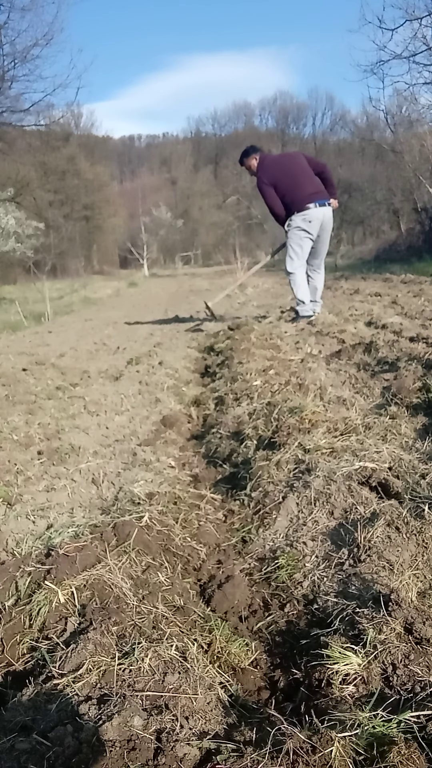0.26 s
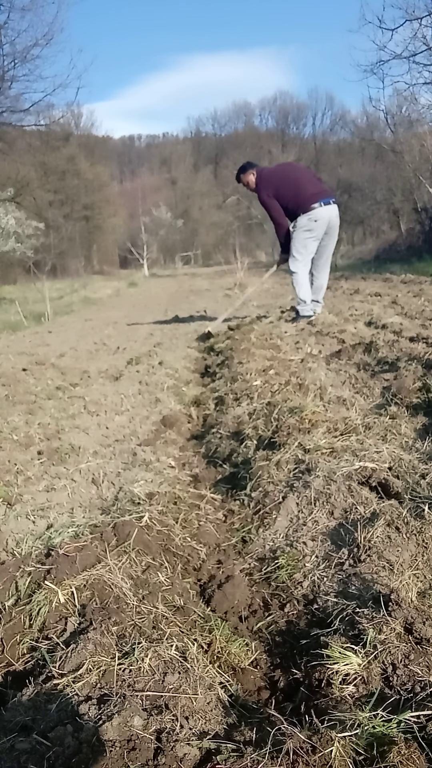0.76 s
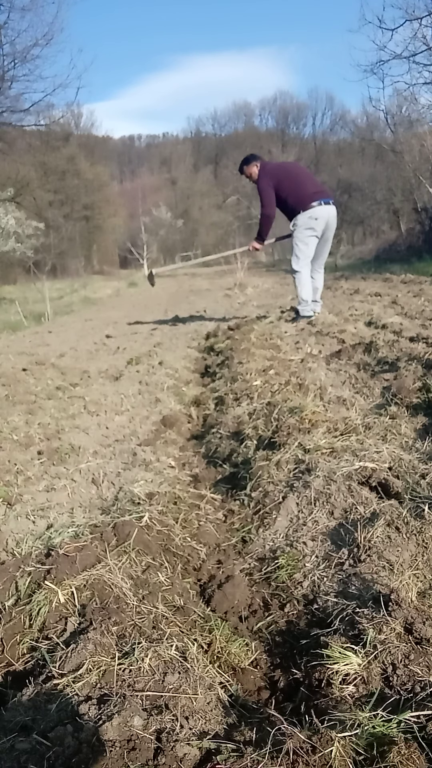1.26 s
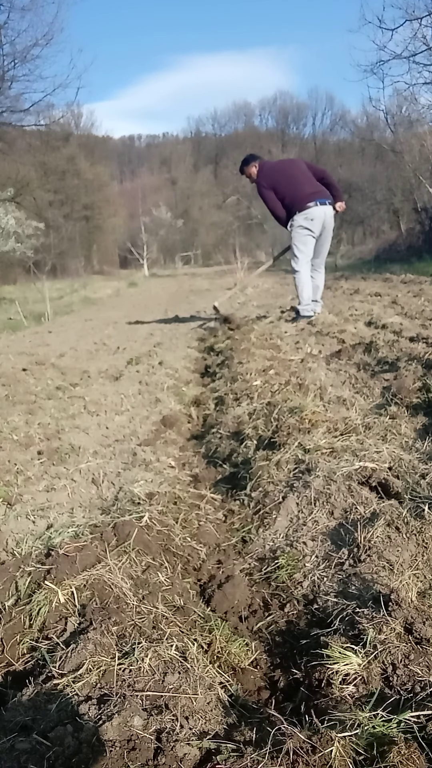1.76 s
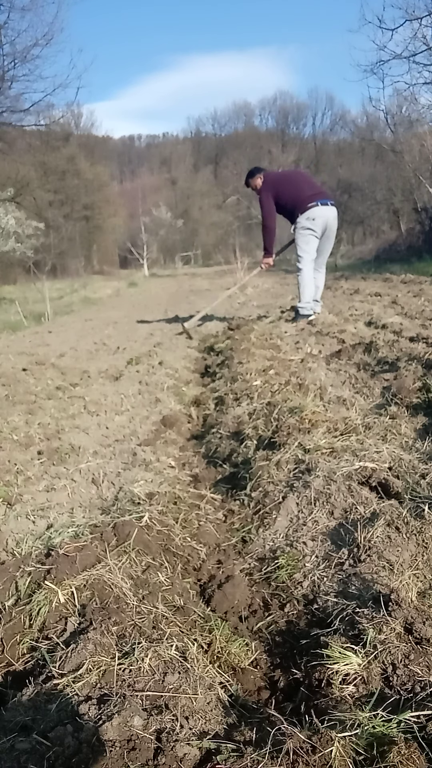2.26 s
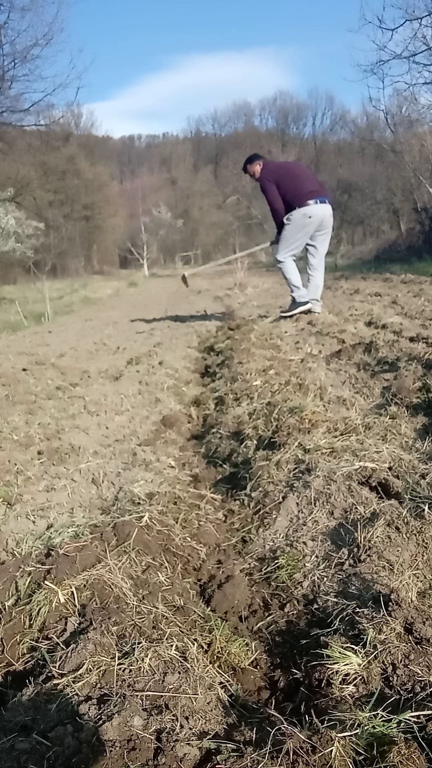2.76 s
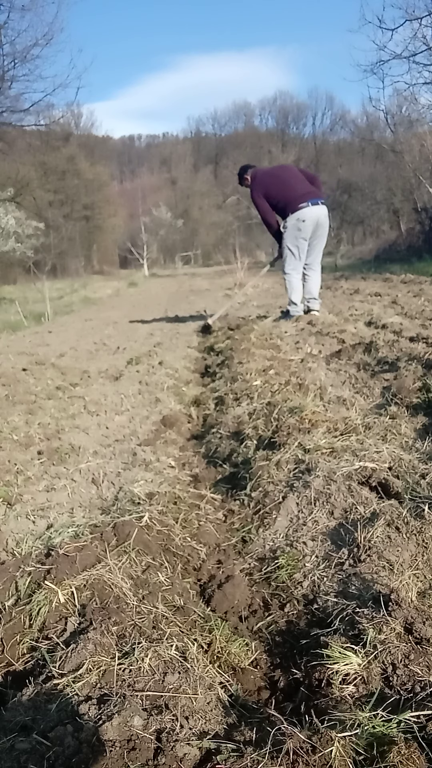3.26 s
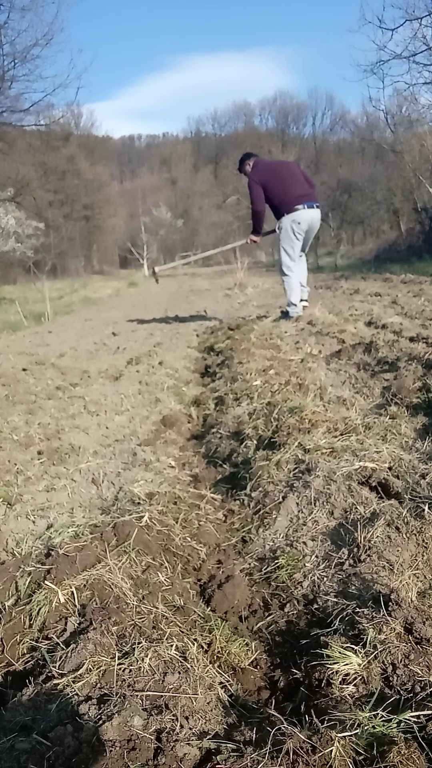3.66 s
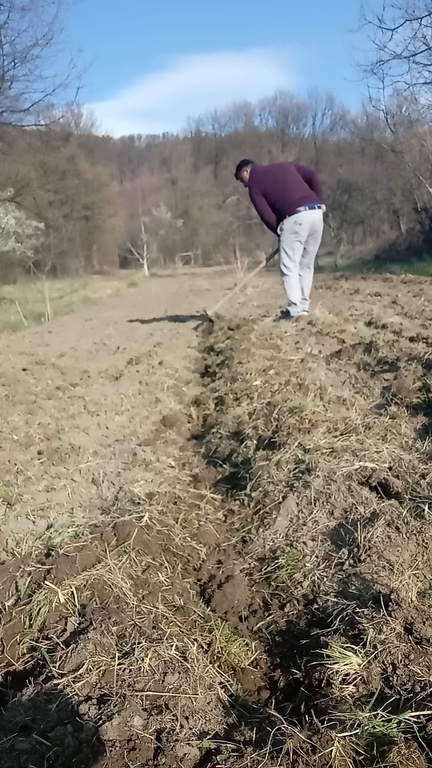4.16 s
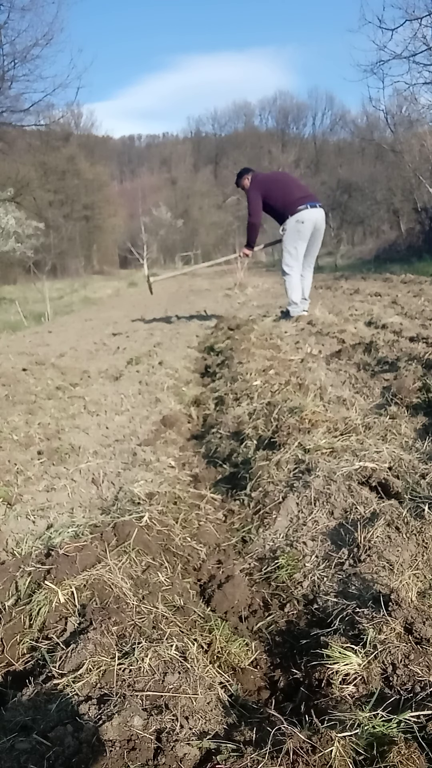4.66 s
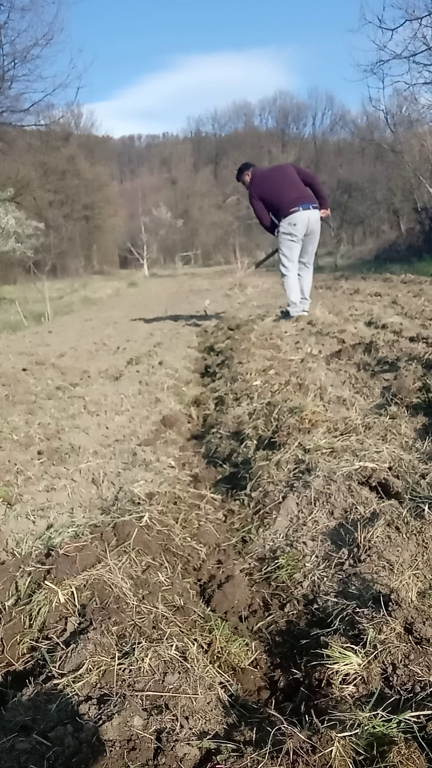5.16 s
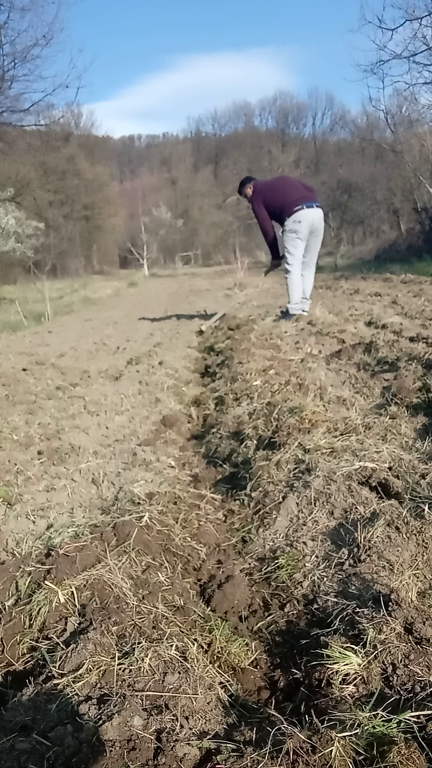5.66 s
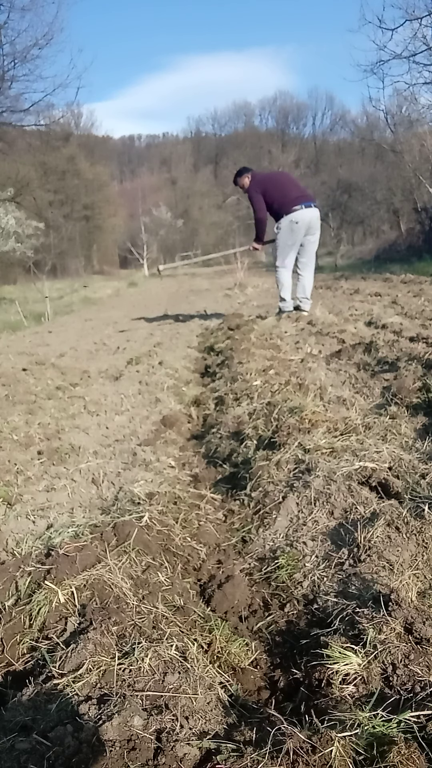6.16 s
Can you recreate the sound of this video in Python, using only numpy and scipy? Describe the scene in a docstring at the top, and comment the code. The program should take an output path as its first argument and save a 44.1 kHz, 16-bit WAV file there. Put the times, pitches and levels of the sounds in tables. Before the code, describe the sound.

Steady low phone buzzes come and go every two seconds outdoors, with small ticks, soft bumps and distant crisp hoe strokes in dry earth.

```python
"""A phone's vibration motor is already buzzing; it stops, then runs one second in every two beside the microphone.
Its off-centre weight spins up, shakes the case and coasts to rest while shaft and brushes rasp.
From the first pause on, a hoe chops dry soil across a quiet field, and ticks and soft bumps sound now and then.
Throughout, coloured noise makes the murmur of the air and the rumble of a breeze, and a gliding sine hums far off."""
import sys
import numpy as np
from scipy import signal
from scipy.fft import rfft, irfft, next_fast_len
from scipy.io import wavfile
from scipy.ndimage import uniform_filter1d

SR = 44100
rng = np.random.default_rng(int(sys.argv[2]) if len(sys.argv) > 2 else 0)


def digitize_waveform(pressure):
    """Quantize a signal to 16-bit integers and store it at the path in sys.argv[1].

    Rows of a 2-D input are taken as channels; values are limited to [-1, 1].
    """
    field = np.atleast_2d(pressure).T
    bounded = np.clip(field, -1, 1)
    quanta = np.round(bounded * 32767).astype(np.int16)
    wavfile.write(sys.argv[1], SR, quanta)


N = 283563
TIME = np.arange(N) / SR
AGE = np.arange(SR // 3) / SR  # seconds since a hit

# low hum, probably a far engine: time_s, pitch_hz, level_db
HUM_TRACK = [(0.0, 62, -63), (0.1, 60.6, -69.5), (2.66, 57.23, -71), (2.97, 63.3, -73), (3.66, 60.9, -64),
             (5.47, 66.14, -65), (5.9, 66.9, -72)]
# spectrum of the open air: frequency_hz, relative_density_db (per Hz)
AIR_SPECTRUM = [(120, -24.5), (200, -17), (380, -18), (560, -5), (750, -5.5), (1050, 1.5), (1500, -4.5),
                (1850, -11.5), (2200, -20), (2800, -28), (4500, -31.5), (6500, -34.5), (8500, -48),
                (16000, -46.5)]
# spectrum of the breeze's rumble: frequency_hz, relative_density_db (per Hz)
RUMBLE_SPECTRUM = [(20, -27.5), (35, -19.5), (50, -4), (62, -0.5), (78, -1.5), (110, -2), (170, -11),
                   (260, -24.5), (500, -53)]
# soft bumps on the phone: start_s, level_db, pitch_hz, t60_s
PHONE_BUMPS = [(.762, -40.5, 89, 0.048), (4.945, -43, 101.4, 0.11), (4.99, -46.5, 105, 0.089),
               (5.083, -28.5, 124, 0.031), (5.104, -39, 86, 0.11), (5.365, -48, 123, 0.065),
               (6.35, -46, 85, 0.19)]
# sharp ticks, mostly the motor catching or settling: start_s, level_db, centre_hz
SHARP_TICKS = [(0.8698, -59.5, 4400), (.9638, -79, 7160), (1.4337, -51, 5660), (1.44, -50, 5800),
               (2.56, -56.5, 5300), (3.3356, -71, 2800), (3.4345, -46.5, 4590), (3.453, -61, 5000),
               (5.4409, -54, 5260), (5.448, -48.5, 5000), (5.452, -52, 5500)]
# hoe blows: start_s, level_db, bite_length_s, treble_tilt_db_per_octave
HOE_BLOWS = [(0.7235, -49, 0.0046, 3), (0.729, -48, 0.0046, 2), (.742, -46, 0.015, -0.5),
             (1.527, -54.5, 0.01, -1), (2.316, -58, 0.0085, 5), (3.194, -56, 0.011, 6),
             (3.208, -55.5, 0.017, -3.5), (4.0209, -46.5, 0.0074, 1), (4.8183, -47.5, 0.0099, 0),
             (5.67, -54, 0.0063, -1)]
# spectrum of the blade biting the soil: frequency_hz, relative_density_db (per Hz)
BITE_SPECTRUM = [(300, -17), (1100, -11), (1750, 1), (2200, -0.5), (2850, 3), (3400, -10), (4500, -3),
                 (5200, -11), (7400, -6.5), (9000, -19.5), (13000, -28.5), (15500, -23)]
# spectrum of the crumbs it throws: frequency_hz, relative_density_db (per Hz)
CRUMB_SPECTRUM = [(500, -8.5), (1800, 5.5), (2600, 0.5), (3100, 8), (3700, -2), (4600, -2), (5500, -3.5),
                  (7400, -4), (9500, -19), (15000, -30)]
# ringing modes of the hoe blade: frequency_hz, relative_level_db
BLADE_MODES = [(3100, -4), (3850, -3.5), (4600, -1), (7450, -9)]
# motor runs: on_s, off_s, full_speed_hz (turns per second)
MOTOR_RUNS = [(-.566, .416, 187.4), (1.434, 2.419, 188.2), (3.434, 4.427, 188.1), (5.441, 6.43, 188.2)]
FULL_SPEED_HZ = MOTOR_RUNS[1][2]
# partials of the rasp of one turn, as heard through the case: multiple_of_speed, relative_level_db
RASP_PARTIALS = [(1, 0), (2, -41), (3, -35), (4, -41), (5, -23.5), (6, -37), (7, -33), (8, -21), (9, -29),
                 (10, -49), (11, -36), (12, -39), (13, -33), (14, -41), (15, -38), (16, -55), (17, -31),
                 (18, -43), (19, -39), (20, -33), (21, -40), (22, -37), (23, -38), (24, -33), (25, -41),
                 (26, -31), (27, -36), (28, -38), (29, -41), (30, -35), (31, -44), (32, -31.5), (33, -48),
                 (34, -47), (35, -39), (36, -47), (37, -48), (38, -49), (39, -53), (40, -56), (41, -43),
                 (42, -56), (43, -53), (44, -53), (45, -63), (46, -57), (47, -63), (48, -53), (49, -56),
                 (50, -65), (51, -61), (52, -59), (53, -57), (54, -69), (55, -58), (56, -56), (57, -58),
                 (58, -58), (59, -67), (60, -57), (61, -64), (62, -66), (63, -66), (64, -57), (65, -65),
                 (66, -59)]
# spectrum of the shaft sliding smoothly: frequency_hz, relative_density_db (per Hz)
SLIDE_SPECTRUM = [(200, -16.5), (400, -8.5), (650, 4), (1000, 6), (1600, 1.5), (1950, -6), (2900, -8),
                  (4300, 0), (6500, -12), (7600, -19.5), (9000, -26), (13500, -35), (15500, -21)]
# spectrum of the weight's low unsteadiness: frequency_hz, relative_density_db (per Hz)
JUDDER_SPECTRUM = [(40, -35.5), (110, 0), (190, -3.5), (270, -3.5), (400, -24), (900, -46), (3000, -80.5)]
# how the case passes on rubbing, with a sharp resonance the partials glide through: frequency_hz, relative_gain_db
CASE_RESPONSE = [(180, -24), (400, -20), (620, -9), (950, -1), (1200, -4), (1550, 2), (1900, -10),
                 (2050, -7), (2130, 3), (2210, 5), (2255, -8), (2800, -7), (4600, -1), (6800, -2),
                 (8500, -15), (13500, -28), (15500, -18)]


def undb(db):
    """Decibels express an amplitude ratio logarithmically; this returns the ratio."""
    return 10 ** (np.asarray(db) / 20)


def unit(x):
    """Normalization: dividing by the root mean square gives unit power."""
    return x / np.sqrt(np.mean(x ** 2) + 1e-20)


def colour(x, points, tilt_db=0):
    """Minimum-phase filtering: folding the cepstrum makes a causal filter of unit power gain through the points."""
    hz, db = np.transpose(points)
    size = 8192
    octave = np.log2(np.maximum(np.fft.rfftfreq(size, 1 / SR), 1))
    # the tilt pivots at 4 kHz and stops growing two octaves below
    tilt = tilt_db * np.maximum(octave - np.log2(4000), -2)
    gain = unit(undb(np.interp(octave, np.log2(hz), db) + tilt))
    cepstrum = irfft(np.log(gain))
    cepstrum[1:size // 2] *= 2
    cepstrum[size // 2 + 1:] = 0
    impulse = irfft(np.exp(rfft(cepstrum)))[:size // 2]
    return signal.oaconvolve(x, impulse)[:len(x)]


def noise(size=N):
    """White noise: independent Gaussian samples of rms 1 have a flat mean spectrum."""
    return rng.standard_normal(size)


def walk(rate, size=N):
    """Slow random modulation: joined chance points, rate a second, give a spread near 1."""
    points = rng.standard_normal(2048)
    return 1.2 * np.interp(TIME[:size] * rate, np.arange(len(points)), points)


def fade(t60):
    """Exponential damping: the level falls by 60 dB in t60 seconds after a hit."""
    return np.exp(-np.log(1000) * AGE / t60)


def add(out, start, sound):
    """Superposition: a sound is summed in from start seconds."""
    i = int(start * SR)
    out[i:i + len(sound)] += sound[:N - i]


def hum(waver_db=1.5, waver_rate=7):
    """Periodic tone: one sine of gliding pitch, probably a far engine's firing note, wavers in level."""
    times, hz, db = np.transpose(HUM_TRACK)
    cycle = np.cumsum(np.interp(TIME, times, hz)) / SR
    level_db = np.interp(TIME, times, db) + waver_db * walk(waver_rate)
    return np.sqrt(2) * np.sin(2 * np.pi * cycle) * undb(level_db)


def murmur(air_db=-68.5, swell_db=1.15, flicker_db=1.5, patchy_db=2.5):
    """Band-wise modulation: the bands of distant noise swell and flicker together, and each also drifts
    patchily on its own."""
    size = next_fast_len(N, True)
    level_db = air_db + swell_db * walk(6.5) + flicker_db * walk(25)
    air = rfft(colour(noise(), AIR_SPECTRUM) * undb(level_db), size)
    band = np.digitize(np.fft.rfftfreq(size, 1 / SR), [700, 1000, 1400, 2400])
    out = 0
    for k in np.unique(band):
        out = out + irfft(air * (band == k), size)[:N] * undb(patchy_db * walk(9))
    return out


def breeze(breeze_db=-69, gust_db=3.5, gusts_per_s=9):
    """Turbulent pressure: low-frequency noise at the microphone rises and falls with the gusts."""
    rumble = colour(noise(), RUMBLE_SPECTRUM + [(2000, -120)])
    return rumble * undb(breeze_db + gust_db * walk(gusts_per_s))


def field():
    """Superposition of independent noises: the murmur of the air lies over the breeze's rumble."""
    return murmur() + breeze()


def bumps(push_s=0.0033):
    """Damped oscillation: a soft push on the case sets off a low, quickly decaying sine."""
    out = np.zeros(N)
    for start, db, hz, t60 in PHONE_BUMPS:
        push = 1 - np.exp(-AGE / push_s)
        add(out, start, undb(db) * fade(t60) * push * np.sin(2 * np.pi * hz * AGE))
    return out


def ticks(t60=0.0055, tail_db=-22, tail_t60=0.14):
    """Impulsive contact: a tiny hard hit is a short burst of band-limited noise with a faint tail."""
    out = np.zeros(N)
    for start, db, hz in SHARP_TICKS:
        hit = noise(len(AGE)) * undb(db) * (fade(t60) + undb(tail_db) * fade(tail_t60))
        band = [(hz / 4, -25), (hz * 0.65, -4), (hz, 0), (hz * 1.43, -5), (hz * 2, -20)]
        add(out, start, colour(hit, band))
    return out


def hoe(crumb_db=-15, crumb_t60=0.23, grit_db=3, ring_db=-23, ring_t60=0.27):
    """Fracture and modal ringing: grains crack in a short swell, then crumbs spray and the blade rings faintly."""
    out, size = np.zeros(N), len(AGE)
    for start, db, length, tilt_db in HOE_BLOWS:
        progress = np.minimum(AGE / length, 1)
        grains = unit(noise(size) * undb(grit_db * walk(268, size)))
        bite = colour(grains * np.sin(np.pi * progress), BITE_SPECTRUM, tilt_db)
        push = progress * np.sqrt(length / 0.0036)  # a longer bite throws more
        spray = noise(size) * push * fade(crumb_t60)
        crumbs = colour(spray * undb(crumb_db + 4.4 * walk(200, size)), CRUMB_SPECTRUM)
        modes = sum(undb(mode_db) * walk(60, size) * np.sin(2 * np.pi * hz * AGE) for hz, mode_db in BLADE_MODES)
        ring = modes * push * fade(ring_t60) * undb(ring_db)
        add(out, start, undb(db) * (bite + crumbs + ring))
    return out


def spin(rise_s=.054, creep=.025, creep_s=.3, coast_s=.105, drag_hz=28, wobble=0.000862):
    """Rotational inertia: speed in turns a second rises fast, creeps to full, then friction stops it; also the drive."""
    speed, drive = np.zeros(N), np.zeros(N)
    for on, off, full_hz in MOTOR_RUNS:
        driven = np.clip(TIME, on, off) - on
        up = full_hz * (1 - (1 - creep) * np.exp(-driven / rise_s) - creep * np.exp(-driven / creep_s))
        coasting = np.exp(-np.maximum(TIME - off, 0) / coast_s)
        # steady drag brings the weight to a full stop
        speed += np.maximum((up + drag_hz) * coasting - drag_hz, 0)
        drive += (TIME > on) & (TIME < off)
    return speed * (1 + wobble * walk(25)), uniform_filter1d(drive, SR // 100)  # 10 ms edges


def rasp(turn, scatter=1.5, shift=.2, shift_rate=4, flutter=.1):
    """Periodic friction: rubs recur on every turn; contacts shift slowly and flutter, most in high partials."""
    multiple, db = np.transpose(RASP_PARTIALS[1:])  # the first partial is left to the shake
    case_hz, case_db = np.transpose(CASE_RESPONSE)
    # force at the shaft: what is heard at full speed, less the gain of the case
    force = undb(db - np.interp(np.log(multiple * FULL_SPEED_HZ), np.log(case_hz), case_db))
    loose = force * np.minimum(multiple / 14, 1)
    size = 16384  # points in the waveform of one turn
    place = (turn % 1 * size).astype(int)
    layers = [
        (force, 1),
        (loose, shift * walk(shift_rate)),
        (loose, shift * walk(shift_rate)),
        (loose, flutter * walk(40)),
    ]
    out = 0
    for gains, weight in layers:
        partials = gains * np.exp(1j * scatter * rng.standard_normal(len(gains)))
        out = out + weight * irfft(np.r_[0, 0, partials], size)[place]
    return out * size / np.sqrt(2)  # each partial's rms is its gain


def motor(shake_db=-37.5, rasp_db=-45.5, slide_db=-67.5, coast_db=-65.0, strain_db=-57.5, gating=0.74,
          play=.0004, chatter=0.023, judder_db=-66, lag_s=0.0073):
    """Rotating imbalance and friction: a near sine grows steeply with speed; shaft and brushes rasp through it."""
    speed, drive = spin()
    turn, pace = np.cumsum(speed) / SR, speed / FULL_SPEED_HZ
    # the swing of the case dies away a moment after the weight slows
    swing = np.maximum(pace, np.interp(TIME - lag_s, TIME, pace)) ** 5.2
    shake = np.sqrt(2) * np.sin(2 * np.pi * turn) * swing * undb(shake_db + 0.37 * walk(60))
    # no two turns are quite alike
    judder = colour(noise(), JUDDER_SPECTRUM) * pace ** 1.1 * undb(judder_db)
    # the shaft chatters in its bearing while it gathers speed
    strain = drive * np.maximum(1 - pace, 0)
    jitter = (play + chatter * strain ** 3.8 * pace) * walk(200)
    rubs = rasp(turn + jitter) * undb(rasp_db) * pace ** 0.98 * (0.22 + 0.69 * drive)
    # the shaft is pressed against each side of its bearing once a turn
    sides = gating * np.cos(4 * np.pi * turn) + 0.2 * np.cos(2 * np.pi * turn)
    pressure = unit(np.exp(sides * pace))
    # it slides smoothly at full speed and scrapes when straining or coasting
    straining = strain ** 0.41 * pace ** 0.45 * undb(strain_db)
    coasting = (1 - drive) * pace ** .5 * np.tanh(pace / 0.078) * undb(coast_db + 1.15 * walk(170))
    sliding = colour(noise() * pressure * pace * drive * undb(slide_db), SLIDE_SPECTRUM)
    scrape = noise() * pressure * (straining + coasting)
    return shake + judder + sliding + colour(rubs + scrape, CASE_RESPONSE)


def scene():
    """Linear superposition: the pressures of all sources add at the one microphone."""
    return (hum() + field() + bumps() + ticks() + hoe() + motor())[None]


def record(dry, top_hz=15800):
    """Band limitation: the phone's steep low-pass removes the extreme treble."""
    lowpass = signal.ellip(10, .2, 70, top_hz, fs=SR, output="sos")
    return signal.sosfilt(lowpass, dry)


dry = scene()
out = record(dry)
digitize_waveform(out)
```